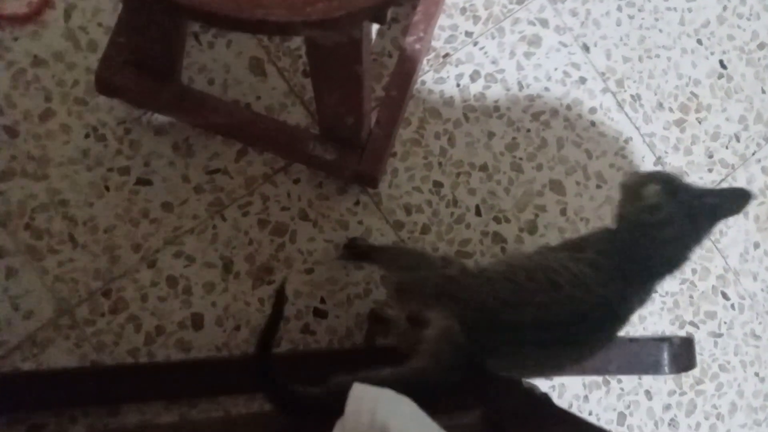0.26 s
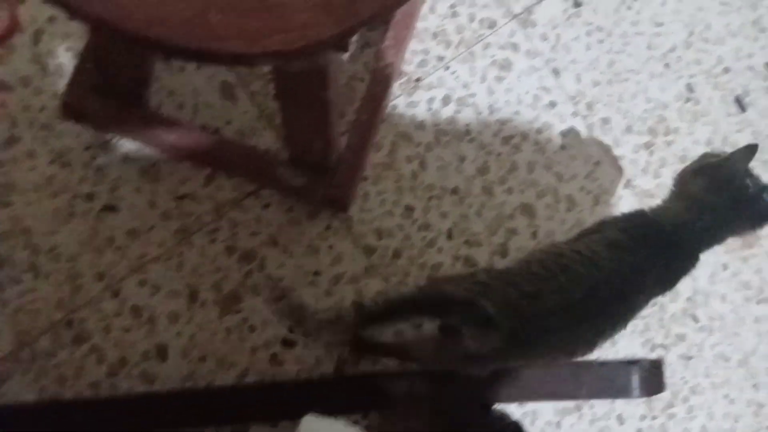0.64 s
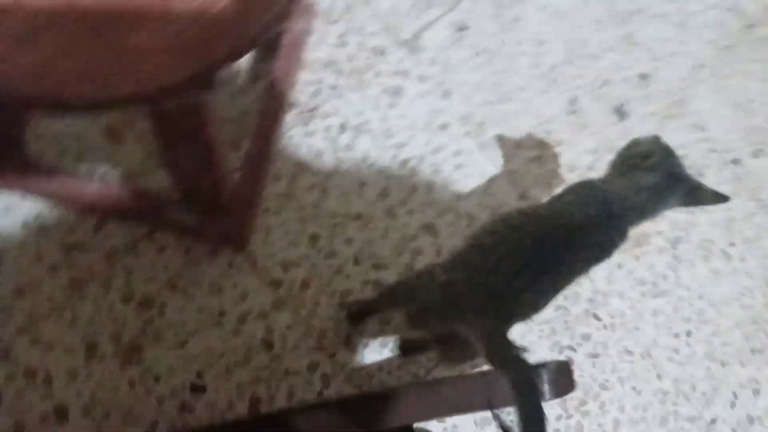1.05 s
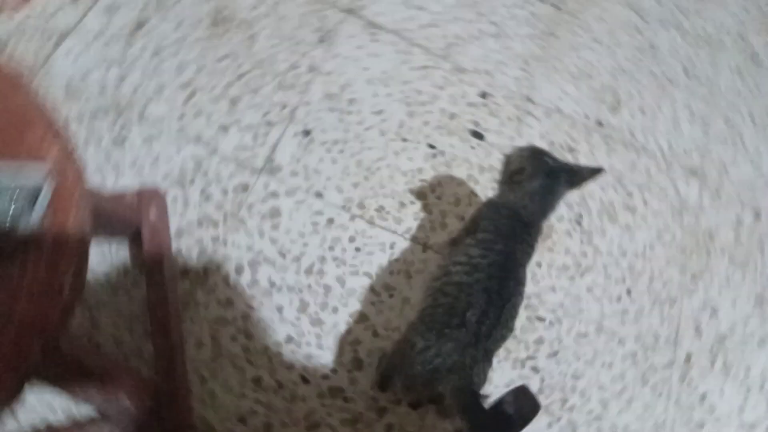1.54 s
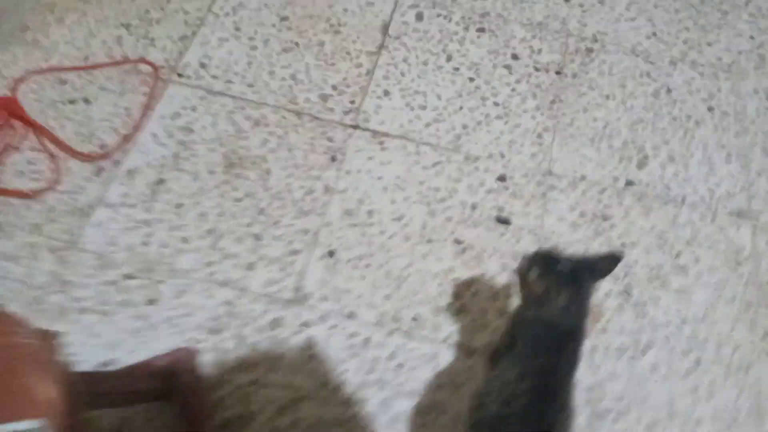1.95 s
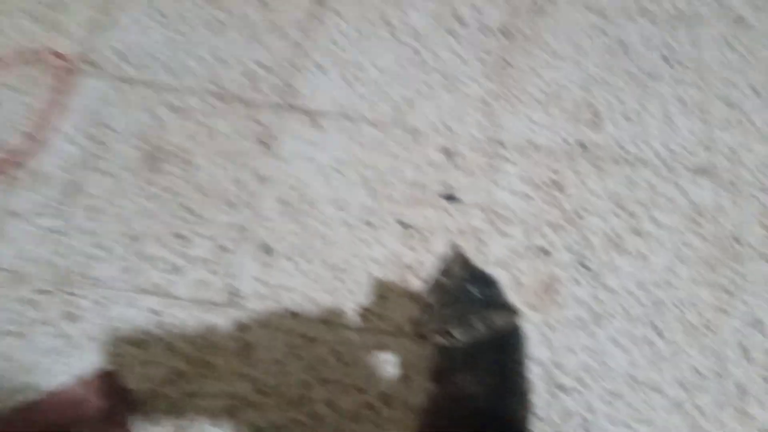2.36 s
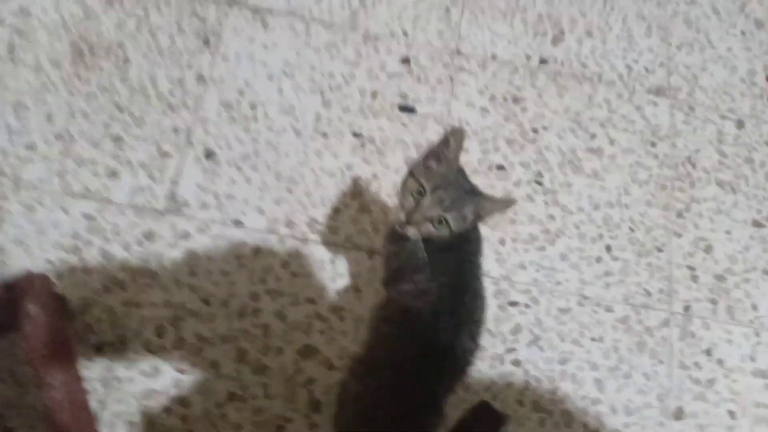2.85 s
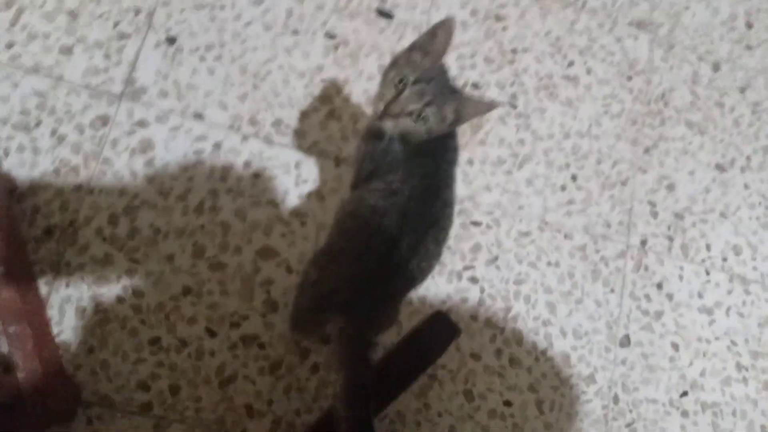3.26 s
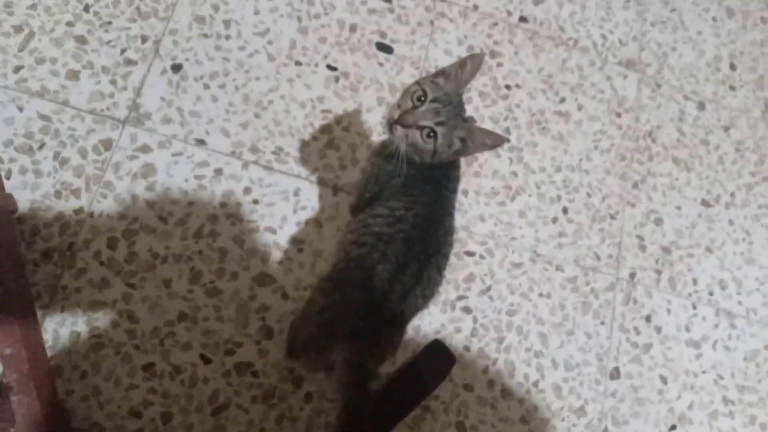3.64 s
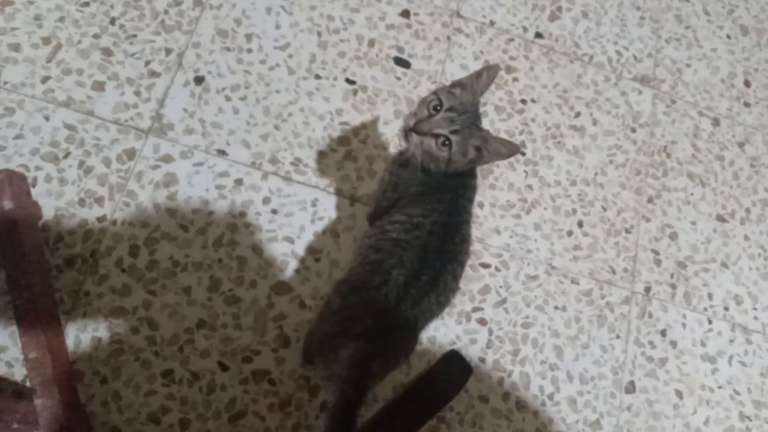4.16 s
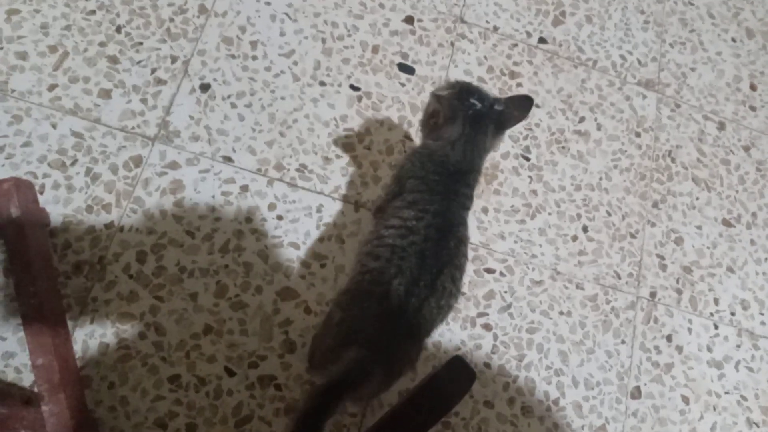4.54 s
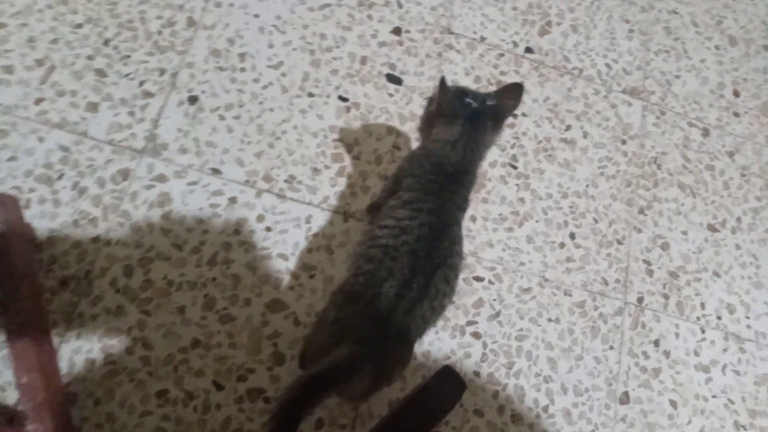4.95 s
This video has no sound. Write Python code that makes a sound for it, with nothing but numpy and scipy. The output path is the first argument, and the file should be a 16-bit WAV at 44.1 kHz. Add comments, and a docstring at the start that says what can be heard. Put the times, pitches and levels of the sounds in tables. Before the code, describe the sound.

A low wavering engine-like hum and dull room air run throughout a small tiled room. After a soft rapid stutter, a kitten's claws knock and scuff the floor in a busy burst, then scrabble more lightly. Later come sparse ringing clicks, the sharpest past the middle, and one faint final scuff. Close single-channel handheld microphone, short bright reverberation.

```python
"""A small room with a hard tile floor, where a kitten plays, followed closely by someone with a camera.
A low throbbing hum, like a distant idling engine, is a set of wavering harmonics; air and hiss are shaped noise.
A soft stutter is a train of even slips; taps and bright ringing clicks are short contacts driving resonances.
Dry scuffing is random grains in three bands, with faint ticks where claws catch.
Contacts and scuffs excite a diffuse reverberation that decays at its own speed in each band."""
import sys
import numpy as np
from scipy import signal
from scipy.fft import rfft, irfft
from scipy.io import wavfile
from scipy.ndimage import uniform_filter1d

SR = 44100
rng = np.random.default_rng(int(sys.argv[2]) if len(sys.argv) > 2 else 0)


def dump(signal):
    """Clip the signal to [-1, 1] and save it as 16-bit WAV at the path in sys.argv[1]."""
    limited = np.clip(np.atleast_2d(signal).T, -1, 1)
    pcm = np.round(limited * 32767).astype(np.int16)
    wavfile.write(sys.argv[1], SR, pcm)


N = 229055
BINS = np.fft.rfftfreq(4096, 1 / SR)  # frequency grid of the resonance curves [Hz]
LEVEL_SPAN = 0.008 * SR  # contact levels are set over 8 ms [samples]
EDGE_HZ = 15900  # upper limit of the band

# upper harmonics of the hum: (multiple of the fundamental, relative level [dB])
HUM_UPPER = [(5, 3.5), (6, 3.5), (7, -6.5), (8, -4), (9, -9.5), (10, -13)]
# course of the hum, before small trims: (time [s], third multiple [dB], fourth multiple [dB], upper tones [dB])
HUM_LEVEL = [(0.0, -58, -52.5, -51.5), (0.43, -67, -52.5, -48.5), (0.78, -49, -52, -59.5),
             (0.82, -47, -44, -43), (0.91, -65, -49.5, -50), (1.37, -46, -51, -56),
             (1.42, -64, -53.5, -48.5), (2.27, -59, -55, -59), (2.63, -47, -56, -49), (2.89, -58, -62, -53),
             (3.96, -47.5, -53.5, -53), (4.24, -66, -56, -64.5), (4.54, -59, -47, -48),
             (5.19, -55, -56.5, -62.5)]
HUM_HZ, HUM_WANDER_DB, HUM_WANDER_HZ = 26.29, 3.5, 1.6
# spectrum of the room air: (frequency [Hz], relative density [dB per Hz])
AIR_TONE = [(20, -20), (45, -10), (75, -5.5), (150, 3), (240, -4), (330, -9), (500, -15), (1000, -20.5),
            (2000, -24), (5000, -26), (6500, -31), (8500, -45.5), (16000, -44.5)]
AIR_DB, HISS_DB = -56.5, -74

# reverberation of the room: (frequency [Hz], time to fall 60 dB [s])
ROOM_DECAY = [(200, 0.25), (600, 0.24), (1500, 0.26), (3000, 0.41), (5000, 0.46), (7000, 0.25),
              (12000, 0.18)]
# resonances that colour taps and scuffs: (centre [Hz], width [Hz], height [dB])
BODY_MODES = [(386, 22, 6), (486, 46, 3.5), (756, 85, -3), (899, 90, 7), (1050, 93, 1), (1203, 28, 2.5),
              (1676, 60, 0.5), (1920, 51, -2.5), (4380, 480, 2)]
CONTACT_RIPPLE_DB = 3  # spread of the random peaks and gaps in each contact's colour

# colour of the stuttering rub: (frequency [Hz], relative level [dB])
SLIP_TONE = [(200, -36), (400, 9), (600, -5), (900, 7), (1100, -10), (1300, 2.5), (1600, -6), (2100, 0.5),
             (2700, -19.5), (4000, -16.5), (6000, -23), (8500, -60)]
SLIP_START_S, SLIP_EVERY_S, SLIP_COUNT = 0.64, 0.0151, 11
SLIP_DB, SLIP_PEAK_S, SLIP_RISE_DB_PER_S, SLIP_FADE_DB_PER_S = -47, 0.714, 600, 55

# bright clicks: (time [s], level [dB], bass [dB], treble [dB], low mode [Hz], middle mode [Hz],
# high mode [Hz], middle mode [dB], high mode [dB], glint [dB], room level [dB])
CLICKS = [(0.8358, -33.5, 3.5, 0, 1310, 2770, 4480, 9, 6.5, 10, -8.5),
          (2.2552, -33.5, 6, -10, 1266, 3100, 5370, 11, 5.5, -3, -9),
          (3.5824, -26, 5.5, 1.5, 1210, 3400, 4700, 11, 12.5, -2, -6.5),
          (3.6333, -32, 4, 6, 1156, 3320, 4850, 5, 13, 26, -2),
          (4.5657, -39, -39, -13, 1310, 2680, 5130, 15.5, 8, 0, -13)]
# colour of a click: (frequency [Hz], relative level [dB])
CLICK_TONE = [(200, -43), (750, -28.5), (1100, -10), (2200, -4), (3700, -6.5), (5600, -6), (6400, -15.5),
              (7600, -22), (8600, -43), (11000, -47), (16000, -60)]
# decay after a click, longest around the high mode: (frequency [Hz], time to fall 60 dB [s])
CLICK_DECAY = [(1200, 0.25), (2500, 0.19), (3400, 0.33), (4300, 0.28), (4900, 0.36), (5600, 0.31),
               (7300, 0.16), (11000, 0.076)]

# taps on the tile: (time [s], level [dB], bass [dB], treble [dB], ring [Hz], room level [dB])
TAPS = [(0.8917, -24, -3, -1, 1560, -4), (1.0013, -31, 5, -5.5, 2940, -6.5),
        (1.1064, -22, 2, -14, 1190, -5.5), (1.234, -30, -1, -6, 2050, -3),
        (1.43, -38.5, -5, -14, 920, -0.5), (1.4401, -39.5, -12, 14.5, 2200, -3),
        (1.452, -39.5, 1, 8, 1490, -13), (1.571, -50, -7, -10, 1290, -2), (1.635, -42, 1, -13, 1580, -5),
        (1.791, -33, 1.5, 1.5, 2090, -7), (1.9385, -44.5, -31, 22, 2200, -0.5),
        (2.046, -41.5, -19, -15, 1800, -8.5), (2.065, -44, -22, 6.5, 2390, 0),
        (2.105, -51, -8, -18, 1010, -2), (2.133, -46, -17, -12, 1180, -9),
        (2.406, -45.5, -19, -3.5, 2140, 2), (2.469, -45, -0.5, -15, 900, 7.5),
        (2.5609, -32, 19.5, -3.5, 950, -7.5), (2.59, -40, 17.5, -14, 1250, -2),
        (2.607, -43, 16, -2, 1390, -15), (2.7201, -38.5, -13, -4, 1830, 0.5),
        (2.867, -47.5, -12, 35, 2280, -1), (3.083, -51, -1, -24, 1100, -5),
        (3.694, -46.5, -10, 3.5, 1900, -17)]
# colour of a tap: (frequency [Hz], relative level [dB])
TAP_TONE = [(100, -26), (220, -18), (400, -3.5), (900, -2), (1800, 3.5), (3000, -2.5), (4800, -1.5),
            (6000, -7), (6800, -15), (7800, -34.5), (10000, -46), (16000, -68)]
TAP_HIGH_RING_HZ = 3080
# colour of the bass that blooms in the room after a tap: (frequency [Hz], relative level [dB])
BLOOM_TONE = [(120, -14.5), (240, 5), (400, -1), (620, 2), (900, -13), (3000, -63)]
BLOOM_DB, BLOOM_RISE_S = -13.5, 0.013

# scuffs over the tile: (start [s], length [s], level [dB], low body [dB], fizz [dB])
SCUFFS = [(0.904, 0.22, -56, -58, -61), (1.117, 0.1, -50, -49, -55), (1.233, 0.22, -50, -54.5, -53.5),
          (1.429, 0.086, -50.5, -55, -50), (1.531, 0.19, -64.5, -69, -58.5), (1.798, 0.31, -54, -84, -50.5),
          (2.032, 0.19, -49.5, -68, -48.5), (2.271, 0.56, -54, -65.5, -59), (2.554, .26, -47.5, -58, -51),
          (2.811, 0.25, -50, -73, -52), (4.33, 0.27, -63.5, -75, -67)]
# colour of the scuffing: (frequency [Hz], relative level [dB])
SCUFF_TONE = [(60, -47), (220, -1), (400, -1.5), (700, 1), (1000, 6), (1500, 3.5), (2200, 6), (3600, -7),
              (4800, -3), (6200, -4.5), (7000, -18), (8000, -38.5), (10000, -38), (16000, -64)]
SCUFF_ATTACK_S, SCUFF_SAG_DB_PER_S, SCUFF_RELEASE_DB_PER_S = 0.028, 17.5, 230
# claws that catch during a scuff; their level is relative to its fizz
CATCHES_PER_S, CATCH_DB, CATCH_SPREAD_DB = 5, 0, 0.5


def gain_of(db):
    """Decibel law: the amplitude ratio of a level."""
    return 10 ** (np.asarray(db) / 20)


def evened(x):
    """Normalisation: scales x to unit rms."""
    return x / np.sqrt(np.mean(x ** 2) + 1e-20)


def read(points, hz):
    """Interpolation: a table of (frequency [Hz], value), joined on a log-frequency axis."""
    f, value = np.transpose(points)
    return np.interp(np.log(hz + 1), np.log(f + 1), value)


def add(mix, s, sound):
    """Superposition: adds a sound to the mix at time s, cut at the end."""
    part = mix[round(s * SR):][:len(sound)]
    part += sound[:len(part)]


def shaped(x, tone):
    """Linear filtering: weights the spectrum of x by a table of (frequency [Hz], level [dB])."""
    hz = np.fft.rfftfreq(len(x), 1 / SR)
    return irfft(rfft(x) * gain_of(read(tone, hz)), len(x))


def drift(rate_hz):
    """Low-passed noise: slow random motion of unit rms."""
    hz = np.fft.rfftfreq(N, 1 / SR)
    return evened(irfft(rfft(rng.standard_normal(N)) * np.exp(-(hz / rate_hz) ** 2), N))


def hum():
    """Harmonic series: multiples of one slow beat, whose tones swell and waver unevenly."""
    s, *levels = np.transpose(HUM_LEVEL)
    t = np.arange(N) / SR
    low_db, main_db, upper_db = (np.interp(t, s, db) for db in levels)
    turns = np.cumsum(HUM_HZ * (1 + 0.00832 * drift(rate_hz=1.58))) / SR

    def tone(order, rough):
        """Random modulation: one harmonic whose amplitude and phase waver, at unit rms."""
        waver = 1 + rough * (drift(rate_hz=11) + 1j * drift(rate_hz=26))
        return evened((waver * np.exp(2j * np.pi * (order * turns + rng.random()))).real)

    upper = np.zeros(N)
    for order, db in HUM_UPPER:
        wandering_db = db + HUM_WANDER_DB * drift(HUM_WANDER_HZ)
        upper += gain_of(wandering_db) * tone(round(order), rough=0.69)
    third = gain_of(low_db + 0.3) * tone(order=3, rough=0.77)
    fourth = gain_of(main_db + 1.0) * tone(order=4, rough=0.87)
    return third + fourth + gain_of(upper_db - 0.5) * evened(upper)


def air():
    """Stationary random noise: a dull room sound, and a thin hiss at the very top."""
    room = evened(shaped(rng.standard_normal(N), AIR_TONE))
    hiss_tone = [(12500, -43), (13900, -9), (14600, -7), (15300, -1.5)]
    hiss = evened(shaped(rng.standard_normal(N), hiss_tone))
    return gain_of(AIR_DB) * room + gain_of(HISS_DB) * hiss


def bump(centre_hz, width_hz):
    """Modal overlap: the outline of a cluster of close resonances, 1 at its centre."""
    return 1 / (1 + (2 * (BINS - centre_hz) / width_hz) ** 4)


def body_db(hz):
    """Resonance: the fixed modes, as a curve in dB."""
    return sum(db / (1 + (2 * (hz - centre) / width) ** 2) for centre, width, db in BODY_MODES)


def ripple(step_hz):
    """Interference: random peaks and notches, new at each call, as where reflections add and cancel."""
    knots = np.arange(0, SR / 2 + step_hz, step_hz)
    return np.interp(BINS, knots, rng.standard_normal(size=600)[:len(knots)])


def causal(db):
    """Minimum phase: the most compact causal ring with this spectrum, of unit energy."""
    log_gain = np.log(gain_of(np.r_[db, db[-2:0:-1]]))
    ring = np.fft.ifft(np.exp(np.conj(signal.hilbert(log_gain)))).real[:len(db)]
    return ring / np.linalg.norm(ring)


def crack(spread_s):
    """Group delay: a contact a few ms long in which each band arrives at its own moment."""
    knots = np.linspace(0, SR / 2, num=45)
    delay = spread_s * np.interp(BINS, knots, rng.uniform(0.081, 1, len(knots)))
    # phase is the running sum of delay over frequency
    return irfft(np.exp(-2j * np.pi * np.cumsum(delay) * BINS[1]))[:len(BINS) // 2]


def blow(spread_s, echo_s, echo_db):
    """Early reflection: a crack and its first hard echo, of unit energy."""
    out = crack(spread_s)
    add(out, echo_s, gain_of(echo_db) * crack(spread_s))
    return out / np.linalg.norm(out)


def room_tail(t60s, rise_s):
    """Reverberation: diffuse reflections of unit energy, each band dying at its own speed."""
    hz, t, z = signal.stft(rng.standard_normal(SR // 2), SR, nperseg=256)
    decay = gain_of(-60 * t / read(t60s, hz)[:, None])
    tail = signal.istft(z * decay, SR, nperseg=256)[1]
    tail *= 1 - np.exp(-(np.arange(len(tail)) / SR / rise_s) ** 2)
    return tail / np.linalg.norm(tail)


def struck(contact, colour_db, level_db, room_db, t60s):
    """Source and filter: a contact and the room's answer ring with one colour."""
    drive = gain_of(room_db) * room_tail(t60s, rise_s=0.0035)
    contact_colour = causal(CONTACT_RIPPLE_DB * ripple(step_hz=330))
    add(drive, 0, signal.fftconvolve(contact, contact_colour))
    colour_db = colour_db + 2.5 * ripple(step_hz=120)
    # the level is the nominal rms of the contact over the level span
    return gain_of(level_db) * np.sqrt(LEVEL_SPAN) * signal.fftconvolve(drive, causal(colour_db))


def stutter():
    """Stick-slip friction: soft, evenly spaced slips that swell quickly and fade before the first taps."""
    out = np.zeros(N)
    for s in SLIP_START_S + SLIP_EVERY_S * np.arange(SLIP_COUNT):
        drop_db = max(SLIP_RISE_DB_PER_S * (SLIP_PEAK_S - s), SLIP_FADE_DB_PER_S * (s - SLIP_PEAK_S))
        contact = crack(spread_s=0.004)
        add(out, s, struck(contact, read(SLIP_TONE, BINS), SLIP_DB - drop_db, -6, ROOM_DECAY))
    return out


def clicks():
    """Modal ringing: small hard clicks sound in three modes, with a narrow band far above."""
    out = np.zeros(N)
    bass = 1 / (1 + (BINS / 2200) ** 8)
    treble = 1 / (1 + (5800 / (BINS + 1)) ** 16)
    for (s, db, bass_db, treble_db, low_hz, middle_hz, high_hz,
         middle_db, high_db, glint_db, room_db) in CLICKS:
        modes_db = 11 * bump(low_hz, width_hz=250) + middle_db * bump(middle_hz, width_hz=590)
        modes_db += high_db * bump(high_hz, width_hz=580) + glint_db * bump(11130, width_hz=350)
        colour_db = read(CLICK_TONE, BINS) + bass_db * bass + treble_db * treble + modes_db
        contact = blow(spread_s=0.00243, echo_s=0.0039, echo_db=-5)
        add(out, s, struck(contact, colour_db, db, room_db, CLICK_DECAY))
    return out


def tap(db, bass_db, treble_db, ring_hz, room_db):
    """Impact excitation: a broad knock with its own balance of bass and treble and two rings."""
    bass = 1 / (1 + (BINS / 600) ** 4)
    treble = 1 / (1 + (3600 / (BINS + 1)) ** 6)
    rings_db = body_db(BINS) + 4 * bump(ring_hz, width_hz=380) + 3 * bump(TAP_HIGH_RING_HZ, width_hz=630)
    colour_db = read(TAP_TONE, BINS) + bass_db * bass + treble_db * treble + rings_db
    contact = blow(spread_s=0.00326, echo_s=0.0038, echo_db=0.5)
    return struck(contact, colour_db, db, room_db, ROOM_DECAY)


def taps():
    """Reverberant build-up: each tap on the tile is followed by a low bloom of the room."""
    out = np.zeros(N)
    bloom = causal(read(BLOOM_TONE, BINS) + body_db(BINS))
    for s, db, bass_db, treble_db, ring_hz, room_db in TAPS:
        add(out, s, tap(db, bass_db, treble_db, ring_hz, room_db))
        # the bloom follows about half of the tap's bass setting
        size = gain_of(db + BLOOM_DB + 0.47 * bass_db) * np.sqrt(LEVEL_SPAN)
        add(out, s, size * signal.fftconvolve(room_tail(ROOM_DECAY, BLOOM_RISE_S), bloom))
    return out


def shifting(x, patchy_db):
    """Time-varying filtering: the colour shifts in patches as the contact travels over the floor."""
    hz, t, z = signal.stft(x, SR, nperseg=1024, noverlap=768)
    patches = uniform_filter1d(rng.standard_normal(z.shape), size=4, axis=0)
    patches = uniform_filter1d(patches, size=8, axis=1)
    # the body resonances act on a rub at 0.78 of their height in dB
    z = z * gain_of(patchy_db * evened(patches) + 0.78 * body_db(hz)[:, None])
    return signal.istft(z, SR, nperseg=1024, noverlap=768)[1][:N]


def scuff_envelope(start, length):
    """Friction envelope: a scuff bites quickly, weakens as it slows, and dies away when it lifts."""
    t = np.maximum(np.arange(N) / SR - start, 0)
    fade_db = SCUFF_SAG_DB_PER_S * t + SCUFF_RELEASE_DB_PER_S * np.maximum(t - length, 0)
    return np.minimum(t / SCUFF_ATTACK_S, 1) * gain_of(-fade_db)


def scuffing():
    """Granular friction: grit catches and slips in clumps of tiny grains, which the room blurs."""
    hz = np.fft.rfftfreq(N, 1 / SR)
    sizes = gain_of(4.2 * np.minimum(rng.exponential(1, N), 4))
    present = rng.random(N) < 1500 / SR  # 1500 grains per second on average
    grains = evened(sizes * rng.choice([-1, 1], N) * present)
    grains *= gain_of(1.53 * drift(rate_hz=25))
    wet = signal.fftconvolve(grains, room_tail(ROOM_DECAY, rise_s=0.027))[:N]
    rub = shifting(grains + gain_of(-2) * wet, patchy_db=4)
    spectrum = rfft(shaped(rub, SCUFF_TONE))
    low = 1 / (1 + (hz / 760) ** 8)
    high = 1 / (1 + (3400 / (hz + 1)) ** 8)
    shares = (1 - low - high, low, high)  # main body, low body, fizz
    bands = np.array([evened(irfft(spectrum * share, N)) for share in shares])
    power = np.zeros((3, N))
    for start, length, *levels_db in SCUFFS:
        power += (gain_of(levels_db)[:, None] * scuff_envelope(start, length)) ** 2
    return (np.sqrt(power) * bands).sum(0)


def catches():
    """Random impacts: now and then a claw catches during a scuff and gives a faint, thin tick."""
    out = np.zeros(N)
    for start, length, _, _, fizz_db in SCUFFS:
        for _ in range(round(CATCHES_PER_S * length)):
            db = fizz_db + CATCH_DB + CATCH_SPREAD_DB * rng.standard_normal()
            tick = tap(db, bass_db=5, treble_db=11.5, ring_hz=rng.uniform(1000, 2300), room_db=-4.5)
            add(out, start + length * rng.random(), tick)
    return out


def scene():
    """Superposition: taps, clicks and rubbing over the sound of the room, in one channel."""
    return (hum() + air() + stutter() + clicks() + taps() + scuffing() + catches())[None]


def record(dry):
    """Band limitation: a steep linear-phase low-pass removes everything above the edge."""
    low_pass = signal.firwin(511, EDGE_HZ, window=("kaiser", 9), fs=SR)
    return signal.oaconvolve(dry, low_pass[None], "same")


dry = scene()
out = record(dry)
dump(out)
```